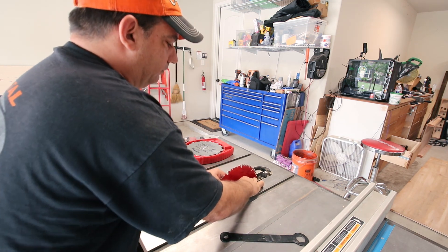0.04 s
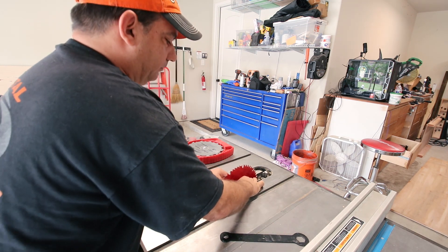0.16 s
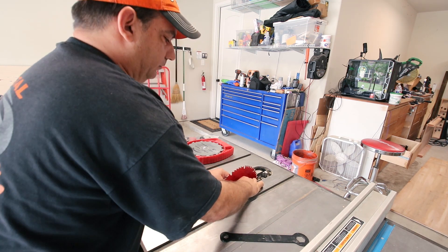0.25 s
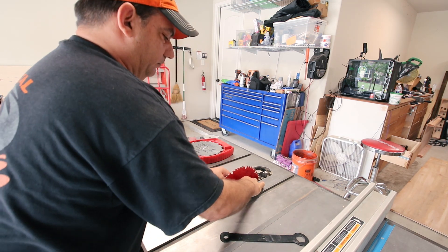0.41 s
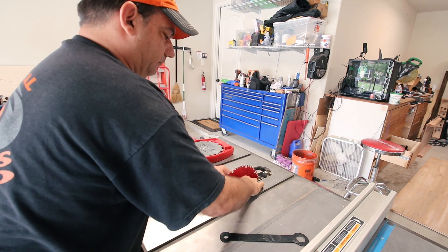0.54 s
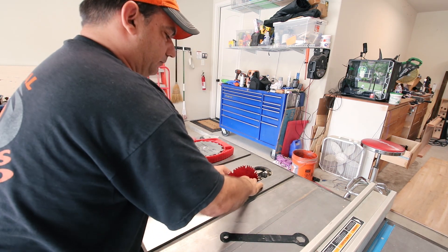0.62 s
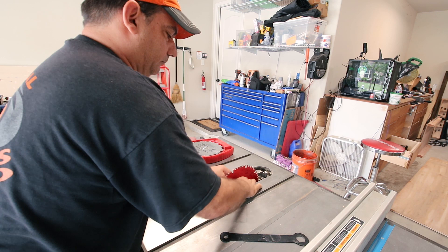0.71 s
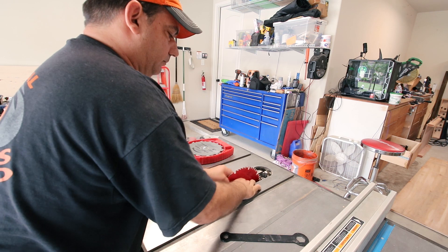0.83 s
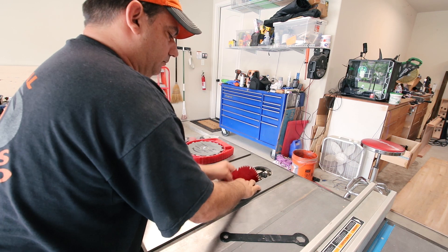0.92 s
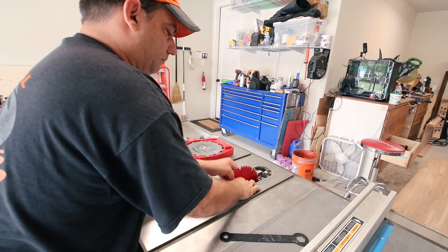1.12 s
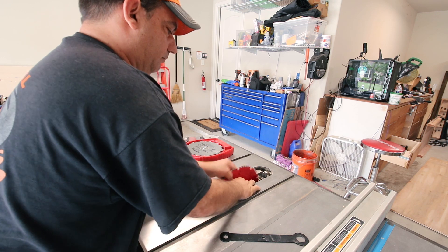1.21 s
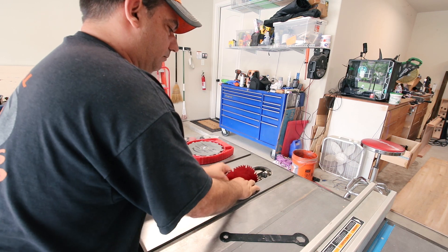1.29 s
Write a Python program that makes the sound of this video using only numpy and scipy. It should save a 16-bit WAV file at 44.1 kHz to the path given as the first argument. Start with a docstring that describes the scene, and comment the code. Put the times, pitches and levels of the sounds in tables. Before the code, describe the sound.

A steel saw blade is fitted onto a table saw shaft. A faint tick at 0.1 s, then a damped clink at 0.2 s with gritty, slightly squealing scraping until 0.35 s. A loud, bright cluster of clattering knocks at 0.41-0.5 s rings and echoes in the hard workshop. Dull rubbing from 0.9 s, lighter knocks around 1.01-1.08 s, and faint taps near 1.22 s over quiet low air.

```python
"""In a hard-walled workshop a hand-held steel saw blade is fitted onto the shaft of a table saw.
It ticks, scrapes and clinks on the shaft, rubs and clatters home against the other blades, then takes
a few lighter knocks. Impacts are decaying modes and shaped noise; slides are random slip pulses, filtered.
The fingers damp the loose blade; the blade stack and saw body ring on; a diffuse echo follows."""
import sys
import numpy as np
from scipy import signal
from scipy.fft import rfft, irfft, next_fast_len
from scipy.io import wavfile

SR = 44100
rng = np.random.default_rng(int(sys.argv[2]) if len(sys.argv) > 2 else 0)


def waveform_to_disk(signal):
    """Save audio, clipped to [-1, 1], as 16-bit WAV at the path in sys.argv[1]."""
    frames = np.transpose(np.atleast_2d(signal))
    scaled = np.clip(frames, -1, 1) * 32767
    samples = np.round(scaled).astype(np.int16)
    wavfile.write(sys.argv[1], SR, samples)


N = 59535

# spectrum of the steel-on-steel crack: (frequency [Hz], relative level [dB])
CRACK_SPECTRUM = [(200, -36), (3000, -1.5), (7000, 0.5), (9000, -4), (12000, -3), (16000, -7)]


def amp(db):
    """Decibels to gain."""
    return 10 ** (np.asarray(db) / 20)


def unit(x):
    """Scale to rms 1."""
    return x / np.sqrt(np.mean(x ** 2) + 1e-20)


def along(points, hz):
    """Interpolate (Hz, value) points on a log frequency axis."""
    point_hz, values = np.transpose(points)
    return np.interp(np.log(hz + 1), np.log(point_hz + 1), values)


def filtered(x, response):
    """Multiply the spectrum of x by a frequency response."""
    size = next_fast_len(N + SR // 2)
    hz = np.fft.rfftfreq(size, 1 / SR)
    return irfft(rfft(x, size) * response(hz), size)[:N]


def shaped(x, spectrum):
    """Colour x by a (Hz, dB) spectrum."""
    return filtered(x, lambda hz: amp(along(spectrum, hz)))


def noise(spectrum):
    """Coloured noise of rms 1."""
    return unit(shaped(rng.standard_normal(N), spectrum))


def rise(attack_s):
    """Exponential approach to 1 with time constant attack_s."""
    return 1 - np.exp(-np.arange(N) / SR / attack_s)


def fade(t60_s):
    """Exponential decay, -60 dB at t60_s."""
    return np.exp(-np.log(1000) * np.arange(N) / SR / t60_s)


def dying(x, t60_points):
    """Decay each frequency of x at its own rate, by short-time spectra."""
    hz, t, spectra = signal.stft(x, SR, nperseg=256)
    decay = np.exp(-np.log(1000) * t / along(t60_points, hz)[:, None])
    return signal.istft(spectra * decay, SR, nperseg=256)[1][:N]


def add(track, start_s, sound):
    """Mix a sound into the track from start_s."""
    start = max(round(start_s * SR), 0)
    track[start:] += sound[:N - start]


def ring(modes):
    """Struck body: a sum of decaying sines, levels and signs scattered anew for each blow."""
    mode_scatter_db = 1.5
    t = np.arange(N) / SR
    out = np.zeros(N)
    for hz, db, t60_s in modes:
        sign = rng.choice([-1, 1])
        gain = amp(db + mode_scatter_db * rng.standard_normal())
        out += sign * gain * fade(t60_s) * np.sin(2 * np.pi * hz * t)
    return out


def slips():
    """Stick-slip: pulses of random size at random instants."""
    slips_per_s = 9000  # mean rate
    return rng.standard_normal(N) * (rng.random(N) < slips_per_s / SR)


def resonant_slips(hz, width_hz):
    """Slips driving two identical causal resonances in series."""
    def response(f):
        one = 1j * f * width_hz / (hz * hz - f * f + 1j * f * width_hz)
        return one ** 2
    return filtered(slips(), response)


def stroke(x, start_s, length_s, edge_s):
    """Gate x to a slide with linear edges, at gate-weighted rms 1."""
    t = np.arange(N) / SR
    to_edge_s = np.minimum(t - start_s, start_s + length_s - t)
    gate = np.clip(to_edge_s / edge_s + .5, 0, 1)
    return x * gate * np.sqrt(np.sum(gate ** 2) / (np.sum((x * gate) ** 2) + 1e-20))


def in_room(x, wet_db):
    """Direct sound plus a diffuse workshop echo that builds up, then dies."""
    # echo decay: (frequency [Hz], T60 [s])
    room_t60 = [(100, 0.81), (500, 0.53), (2000, 0.66), (5000, 0.58), (9000, 0.54), (15000, 0.33)]
    # echo colour: (frequency [Hz], relative level [dB])
    room_colour = [(100, -5), (600, -1), (2500, -6), (5000, -3.5), (9000, -9), (15000, -11)]
    tail = dying(rng.standard_normal(N), room_t60) * rise(attack_s=0.0076)
    tail = shaped(tail / np.linalg.norm(tail), room_colour)
    return x + amp(wet_db) * signal.fftconvolve(x, tail)[:N]


def workshop_air():
    """Steady workshop air: coloured noise, strongest in the bass."""
    # (frequency [Hz], relative level [dB])
    air_spectrum = [(15, -9), (28, 14.5), (70, -5.5), (134, -11), (427, -3.5), (800, -12), (1260, -14),
                    (1740, -20), (4500, -25.5), (7000, -33.5), (16000, -31.5)]
    return amp(-52) * noise(air_spectrum)


def clinks():
    """Loose blade touches the shaft: crack, shaft thud and short ring set by the striking point."""
    # touches: (time [s], struck at "rim" or "bore", ring [dB], thud [dB], crack [dB],
    #           crack cutoff [Hz], room [dB])
    touches = [(0.1093, "rim", -30, -61.5, -38, 10300, -2), (0.2083, "bore", -23, -19.5, -27, 16000, -3.5),
               (0.2113, "bore", -16, -16, -47, 15000, -3.5)]
    # finger-damped blade modes: (frequency [Hz], level struck at rim [dB], at bore [dB], T60 [s])
    blade_modes = [(1560, -10, -12, .04), (1680, -9, -11, .04), (2195, -2, -6, .055), (2370, -22, -1, .03),
                   (3235, -5, -6, .055), (4000, -15, -20, .015), (4510, -24, -2, .028),
                   (5220, -9, -9, .035), (6350, -15, -17, .032), (6700, -30, -11, .028),
                   (7080, -24, -12, .025), (7890, -26, -18, .028), (10000, -28, -17, .02),
                   (11200, -21, -19, .018)]
    # shaft thud: (frequency [Hz], relative level [dB])
    thud_spectrum = [(60, -41), (150, -8.5), (330, -2.5), (510, 7.5), (660, -15), (790, 7.5), (950, -1),
                     (1600, -4.5), (1900, -18), (2350, -3.5), (2800, -1.5), (3600, -9), (6000, -21),
                     (16000, -52)]
    thud_attack_s, thud_t60_s, crack_t60_s = 0.00048, 0.046, 0.03
    out = np.zeros(N)
    for start_s, point, ring_db, thud_db, crack_db, cutoff_hz, room_db in touches:
        modes = [(hz, rim_db if point == "rim" else bore_db, t60_s)
                 for hz, rim_db, bore_db, t60_s in blade_modes]
        thud = noise(thud_spectrum) * rise(thud_attack_s) * fade(thud_t60_s)
        crack = filtered(noise(CRACK_SPECTRUM), lambda hz: 1 / np.sqrt(1 + (hz / cutoff_hz) ** 10))
        crack *= fade(crack_t60_s)
        touch = amp(ring_db) * ring(modes) + amp(thud_db) * thud + amp(crack_db) * crack
        add(out, start_s, in_room(touch, room_db))
    return out


def scrapes():
    """Bore slides along the shaft: dense slips give grit and make one blade mode squeal."""
    # (start [s], length [s], grit [dB], squeal frequency [Hz], squeal [dB])
    slides = [(0.13, 0.012, -48, 3166, -48), (0.171, .012, -59, 3290, -47.5),
              (0.201, 0.0066, -34, 2325, -30.5), (0.211, 0.102, -37, 2256, -43.5),
              (0.295, 0.065, -44.5, 2300, -50.5)]
    # grit: (frequency [Hz], relative level [dB])
    grit_spectrum = [(100, -17), (500, 1), (1100, 2), (1600, 7), (1900, -16), (2350, -11), (3250, 4.5),
                     (3800, -11), (4600, -12), (7000, -16), (10000, -44), (16000, -51)]
    squeal_width_hz, edge_s = 100, 0.0097  # width of each resonance
    out = np.zeros(N)
    for start_s, length_s, grit_db, squeal_hz, squeal_db in slides:
        grit = shaped(slips(), grit_spectrum)
        squeal = resonant_slips(squeal_hz, squeal_width_hz)
        out += amp(grit_db) * stroke(grit, start_s, length_s, edge_s)
        out += amp(squeal_db) * stroke(squeal, start_s, length_s, edge_s)
    return in_room(out, wet_db=-2)


def shifts():
    """Blade rubs against the stack: duller slips, with one low resonance groaning."""
    # (start [s], length [s], rub [dB], groan frequency [Hz], groan [dB])
    rubs = [(0.233, 0.0763, -36, 564, -37.5), (0.339, 0.112, -46, 387, -45.5),
            (0.894, 0.17, -45.5, 627, -57), (0.934, 0.023, -43.5, 321, -47.5),
            (1.056, 0.108, -39, 479.5, -44), (1.195, 0.14, -50, 615, -45.5)]
    # rub: (frequency [Hz], relative level [dB])
    rub_spectrum = [(40, -16.5), (140, 3), (330, 2), (520, -5), (640, 0), (800, -7.5), (1200, -6.5),
                    (1500, -7), (2000, -11.5), (5000, -19), (8000, -32), (16000, -40)]
    groan_width_hz, edge_s = 16, 0.015  # width of each resonance
    out = np.zeros(N)
    for start_s, length_s, rub_db, groan_hz, groan_db in rubs:
        rub = shaped(slips(), rub_spectrum)
        groan = resonant_slips(groan_hz, groan_width_hz)
        out += amp(rub_db) * stroke(rub, start_s, length_s, edge_s)
        out += amp(groan_db) * stroke(groan, start_s, length_s, edge_s)
    return in_room(out, wet_db=-3.5)


def knocks():
    """Blade strikes the stack: crack, dense body rattle and long stack ring; tilt sets brightness."""
    # (time [s], body [dB], ring [dB], crack [dB], body tilt [dB/octave], attack [s])
    blows = [(0.409, -24.5, -39.5, -64, -3, 0.0024), (.430, -21.5, -32.5, -14.5, 0, 0.0001),
             (.4418, -10, -24, -29, 1.03, 0.00026), (.4465, -18.5, -36.5, -17, 2.7, 0.0002),
             (.4505, -23.5, -27.5, -32, -0.8, 0.00032), (.489, -14.5, -33, -42, -0.5, 0.0022),
             (.498, -20.5, -36, -40, 0, 0.0025), (1.013, -25.5, -42.5, -41.5, -2, 0.00027),
             (1.036, -39.5, -47, -63, 1.5, 0.0015), (1.055, -28, -37, -33, 0.5, 0.0004),
             (1.068, -26, -51, -45, 0.5, 0.00078), (1.075, -25, -44.5, -51, -2.5, 0.00061),
             (1.216, -37, -60, -38, -1, 0.0012), (1.2215, -30.5, -45, -42.5, -2.5, 0.00025),
             (1.244, -35.5, -63, -47, 0, 0.0018)]
    # modes of the blade stack on its shaft: (frequency [Hz], level [dB], T60 [s])
    stack_modes = [(394, -11, .65), (468, -11, .55), (601, 1, .5), (1105, -8, .4), (1278, 0, .42),
                   (1465, -9, .5), (1533, -6, .42), (1609, -7, .45), (2203, -2, .42), (2378, -7, .42),
                   (3007, -4, .45), (3653, -6, .45), (4503, -8, .42), (5130, -6, .38)]
    # saw body rattle: (frequency [Hz], relative level [dB])
    body_spectrum = [(50, -46), (130, -14), (280, -8.5), (390, -2.5), (510, -9), (610, 2), (720, -7),
                     (1080, 1.5), (1250, -4), (1500, 4), (1850, -6.5), (2300, -1), (3200, -3.5), (4200, -8),
                     (5200, -7.5), (6000, -16.5), (9000, -21.5), (16000, -24.5)]
    # saw body decay: (frequency [Hz], T60 [s])
    body_t60 = [(200, 0.18), (1500, 0.13), (5000, 0.11), (14000, 0.089)]
    tilt_pivot_hz, crack_t60_s = 1500, 0.042
    out = np.zeros(N)
    for start_s, body_db, ring_db, crack_db, tilt_db, attack_s in blows:
        tilted = [(hz, db + tilt_db * np.log2(hz / tilt_pivot_hz)) for hz, db in body_spectrum]
        body = dying(noise(tilted), body_t60)
        crack = noise(CRACK_SPECTRUM) * fade(crack_t60_s)
        hit = rise(attack_s) * (amp(body_db) * body + amp(crack_db) * crack)
        stack = amp(ring_db) * rise(attack_s) * ring(stack_modes)
        add(out, start_s, in_room(hit, wet_db=1.5) + stack)  # stack ring stays dry
    return out


def scene():
    """Blade work over the quiet air of the workshop."""
    return (workshop_air() + clinks() + scrapes() + shifts() + knocks())[None]


def record(dry):
    """Small microphone: gentle bass cut and a very steep top band limit."""
    low_hz, top_hz = 79, 15880
    highpass = signal.butter(2, low_hz, "highpass", fs=SR, output="sos")
    thin = signal.sosfilt(highpass, dry[0])
    return filtered(thin, lambda hz: 1 / np.sqrt(1 + (hz / top_hz) ** 200))[None]


dry = scene()
out = record(dry)
waveform_to_disk(out)
```